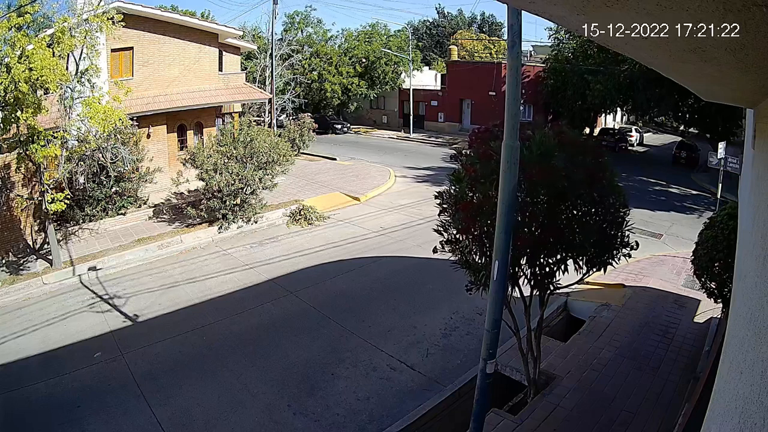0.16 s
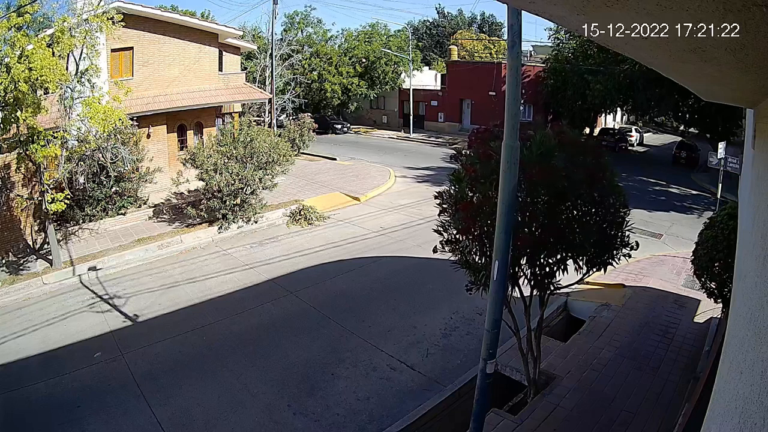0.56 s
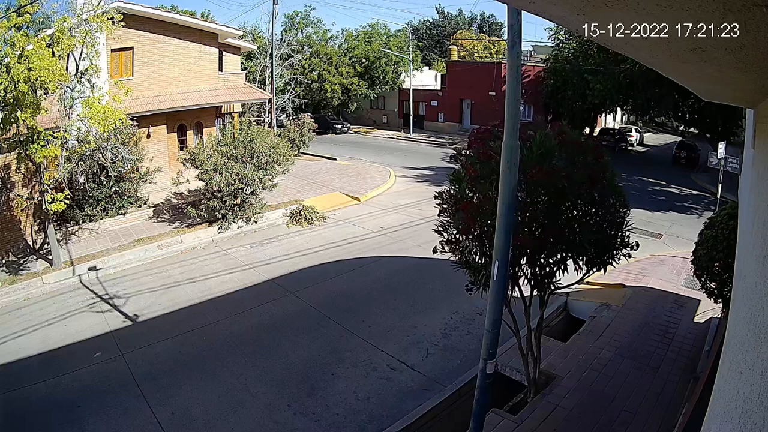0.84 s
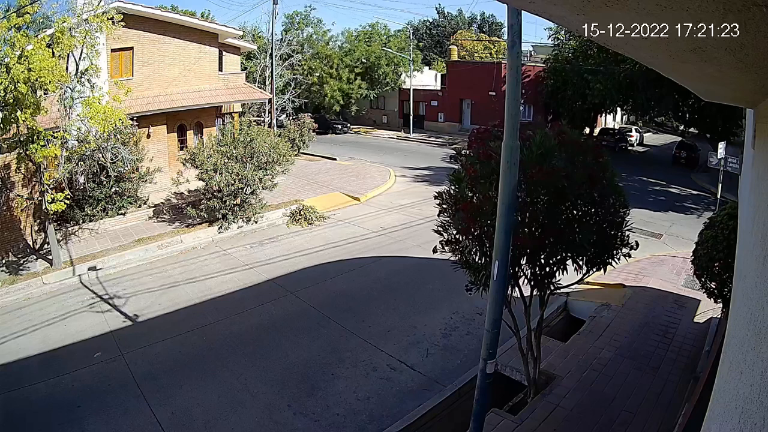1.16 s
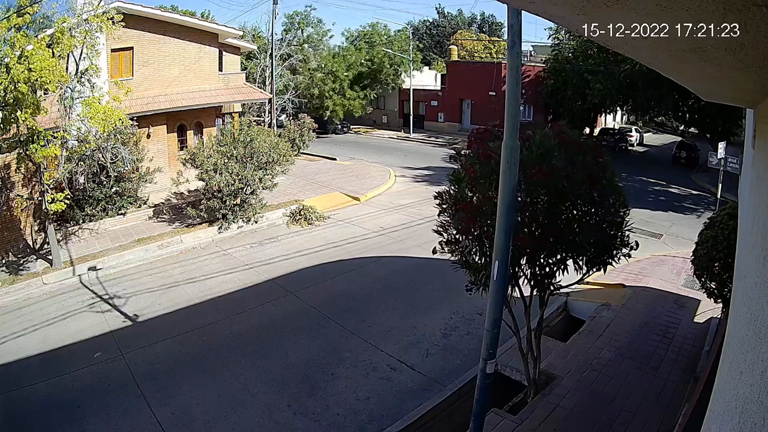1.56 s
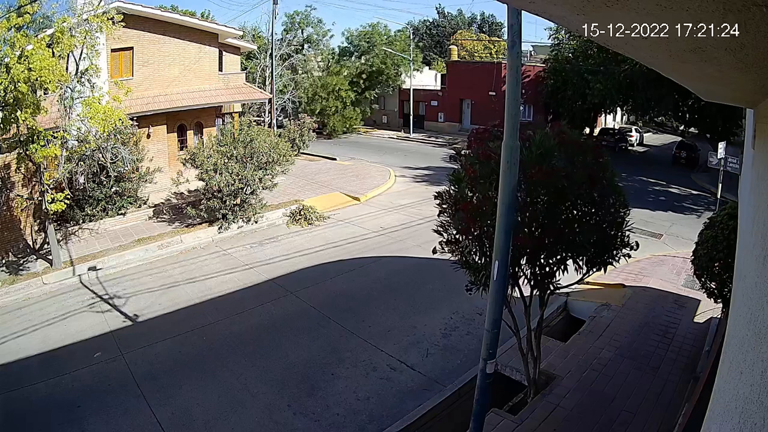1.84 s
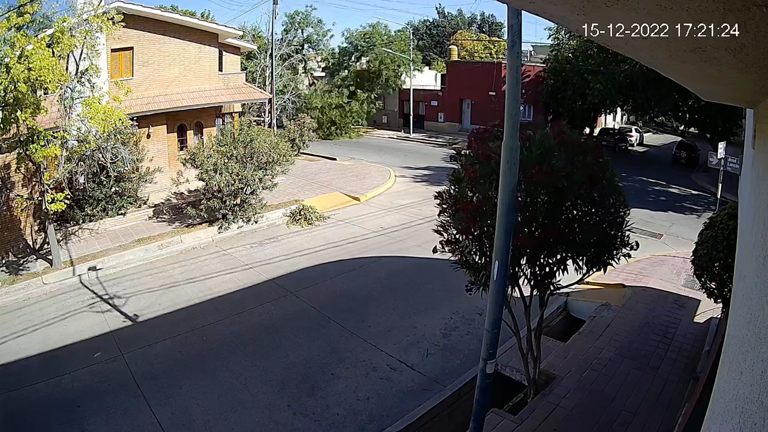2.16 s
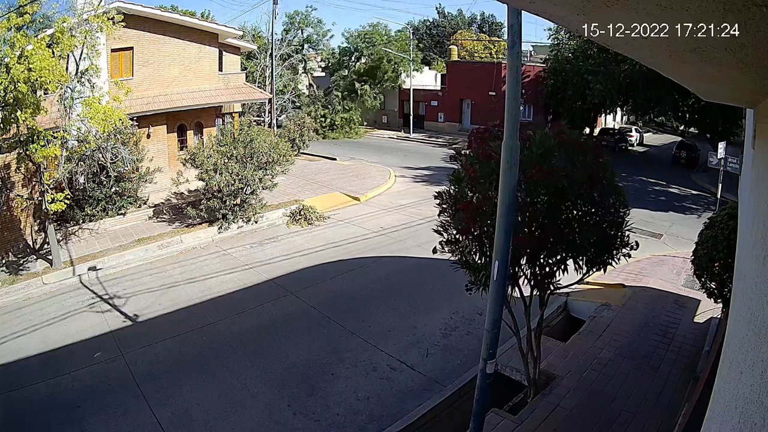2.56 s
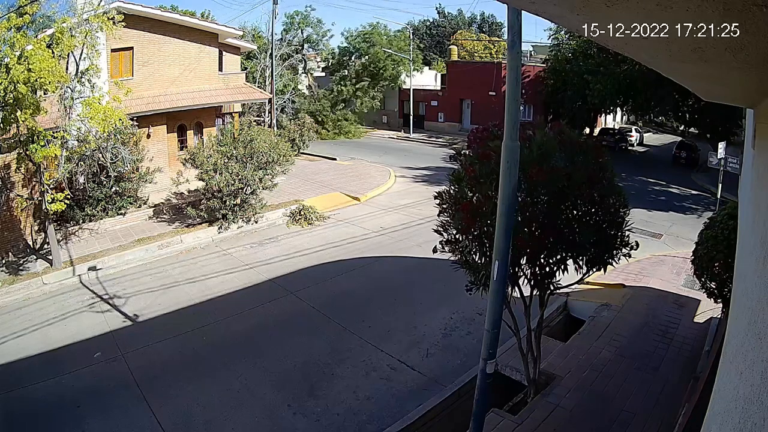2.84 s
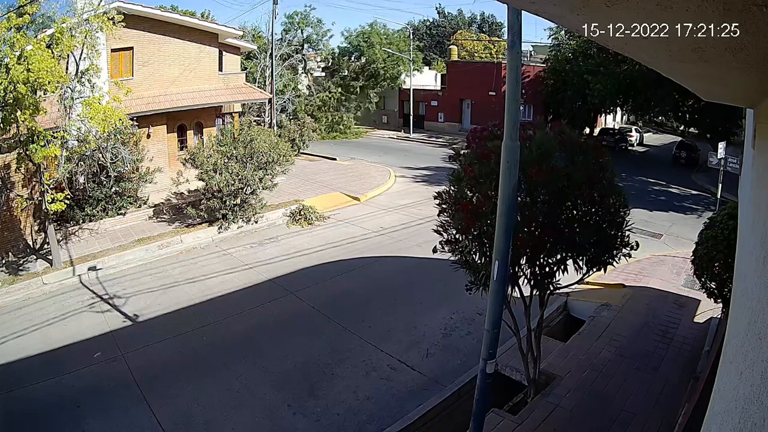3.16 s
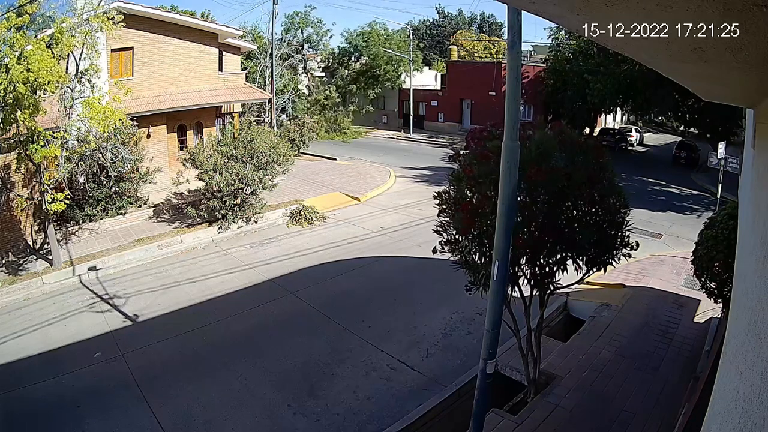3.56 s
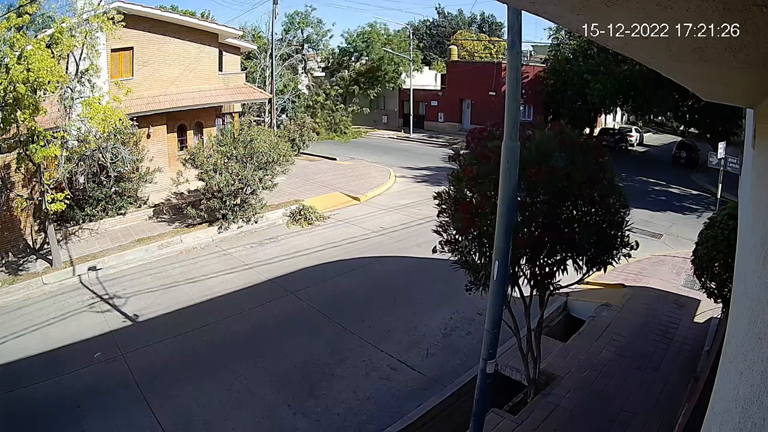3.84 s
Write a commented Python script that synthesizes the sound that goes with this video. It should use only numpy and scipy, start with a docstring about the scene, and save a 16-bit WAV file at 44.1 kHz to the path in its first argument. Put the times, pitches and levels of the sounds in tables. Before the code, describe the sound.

Quiet street, then a sudden loud crack of wood and a dense swarm of snaps, hollow branch knocks and leaf rush, thudding hardest midway and thinning out; short house-front echoes, harsh narrow-band microphone.

```python
"""A big limb splits, tears loose and crashes through its own crown onto the road of a quiet street.
Cracks are sharp snaps and swarms of ringing splinters; thuds are wavering low tones with rumble.
Branches knock as gliding tones, leaves rush as dense ticks, and house fronts echo cracks and knocks.
Behind lie street hush, low wind and a faint wheeze, all shaped from noise.
A small microphone with a peak near 3 kHz overloads on the loudest moments."""
import sys
import numpy as np
from scipy import signal
from scipy.fft import rfft, irfft
from scipy.io import wavfile
from scipy.ndimage import uniform_filter1d

SR = 44100
rng = np.random.default_rng(int(sys.argv[2]) if len(sys.argv) > 2 else 0)


def unload_wav(signal):
    """Save mono or channel-first audio to the path in sys.argv[1] as 16-bit WAV at rate SR, clipped to [-1, 1]."""
    wavfile.write(
        sys.argv[1],
        SR,
        np.round(np.clip(np.atleast_2d(signal).T, -1, 1) * 32767).astype(np.int16),
    )


N = 176400


def from_db(db):
    """Turn dB into gain."""
    return 10 ** (np.asarray(db) / 20)


def rms_one(x):
    """Scale to rms 1."""
    return x / np.sqrt(np.mean(x ** 2) + 1e-20)


def in_time(rows):
    """Draw each column of an automation table as a curve over every sample."""
    s, *columns = np.transpose(rows)
    return [np.interp(np.arange(N) / SR, s, column) for column in columns]


def drift(rate_hz):
    """Slow random wander of rms 1: noise through two equal one-pole low-passes at rate_hz."""
    step = 40   # samples between drawn points
    pole = np.exp(-2 * np.pi * rate_hz * step / SR)
    noise = rng.standard_normal(N // step + 2002)
    slow = signal.lfilter([1], [1, -2 * pole, pole * pole], noise)[2000:]   # skip the settling
    return np.interp(np.arange(N) / step, np.arange(len(slow)), rms_one(slow))


def resonance(x, hz, width_hz):
    """Two-pole resonance with a gain of about 1 at its peak."""
    r = np.exp(-np.pi * width_hz / SR)
    feedback = [1, -2 * r * np.cos(2 * np.pi * hz / SR), r * r]
    return signal.lfilter([(1 - r * r) / 2, 0, (r * r - 1) / 2], feedback, x)


def band_noise(order, low_hz, high_hz):
    """Band-passed noise of rms 1."""
    band = signal.butter(order, [low_hz, high_hz], "band", fs=SR, output="sos")
    return rms_one(signal.sosfilt(band, rng.standard_normal(N)))


def grains(per_s, spread_db):
    """Random clicks of uneven size, each also ringing at one of 40 pitches for 61 cycles (60 dB)."""
    sizes = from_db(spread_db * np.minimum(rng.exponential(1, N), 5)) * rng.choice([-1, 1], N)
    clicks = sizes * (rng.random(N) < per_s / SR)
    pitch_index = rng.integers(0, 40, N)
    rings = np.zeros(N)
    for k, hz in enumerate(np.geomspace(250, 7200, 40)):
        rings += resonance(clicks * (pitch_index == k) + 1e-18, hz, 2.2 * hz / 61)
    return np.sqrt(0.51) * rms_one(rings) + 0.35 * rms_one(clicks)


def coloured(x, spectrum, patchy_db, rate_hz):
    """Shape the spectrum, then let overlapping narrow bands flicker on their own; rms 1."""
    hz, db = np.transpose(spectrum)
    spacing_hz = 140
    bins_hz = np.fft.rfftfreq(N, 1 / SR)
    gain_db = np.interp(np.log(bins_hz + 1), np.log(hz), db, left=-99, right=-99)
    shaped = rfft(x) * from_db(gain_db)
    out = np.zeros(N)
    for centre in np.arange(0, 7600, spacing_hz):
        if hz[0] - spacing_hz < centre < hz[-1] + spacing_hz:
            triangle = np.clip(1 - np.abs(bins_hz - centre) / spacing_hz, 0, 1)
            out += irfft(shaped * triangle, N) * from_db(patchy_db * drift(rate_hz))
    return rms_one(out)


def burst(s, rise_s, t60):
    """Start index and envelope: smooth rise, then exponential fall by 60 dB in t60."""
    start = int(s * SR)
    t = np.arange(min(N - start, int((rise_s + t60) * SR) + 2)) / SR
    rise_s = max(rise_s, .0005)
    rise = np.sin(np.pi / 2 * t / rise_s) ** 2
    fall = from_db(-60 * (t - rise_s) / max(t60, .01))
    return start, np.where(t < rise_s, rise, fall)


# colours of the brittle, woody and treble parts: (frequency [Hz], relative level [dB])
BRITTLE = [(700, -31.5), (1300, -11), (2200, -6), (3000, -5), (3800, -13.5), (4600, -31.5)]
WOODY = [(180, 11.5), (350, 7.5), (600, 7), (1000, 10.5), (1500, 3.5), (2200, -37.5)]
FIZZ = [(3300, -36), (4000, 8.5), (5000, 7.5), (6000, 9.5), (6400, -7), (7300, -16)]
# cracks of wood and twigs: (time [s], relative level [dB], woody part against brittle part [dB],
# rise [s], fall by 60 dB [s])
CRACKS = [(1.13, -6.5, -21, 0.0048, 0.24), (1.137, 7.5, -12, 0.013, 0.16), (1.164, 9, -20, 0.0048, 0.26),
          (1.188, 0, -55, 0.0015, 0.05), (1.237, -4, -34, 0.01, 0.41), (1.267, -4, -46, 0.011, 0.082),
          (1.309, 1, -5.5, 0.0024, 0.19), (1.414, -11, 2.5, 0.0058, 0.13), (1.49, -9, -20, 0.0023, 0.05),
          (1.505, 3, -23, 0.0049, 0.1), (1.513, 9.5, -37, 0.0027, 0.077), (1.529, 14, -18.5, 0.0043, 0.055),
          (1.633, 13.5, -13, 0.0046, 0.1), (1.683, 1.5, -17, 0.0056, 0.18), (1.72, 1, -2, 0.0073, 0.19),
          (1.759, 1.5, 2.5, 0.0042, 0.11), (1.797, -9, 0, 0.0068, 0.082), (1.86, 6.5, -4.5, 0.0029, 0.12),
          (1.893, -8.5, 6.5, 0.003, 0.2), (1.918, 3.5, -23, 0.014, 0.45), (1.941, 5, -4, 0.0023, 0.042),
          (1.968, -4, -2, 0.0046, 0.083), (2.03, -14, 15.5, 0.002, 0.044), (2.104, 4.5, 5.5, 0.0068, 0.24),
          (2.147, 5, -1, 0.0027, 0.15), (2.224, 6, -15, 0.0055, 0.24), (2.271, 10, -21, 0.0071, 0.092),
          (2.373, -7.5, 19.5, 0.0016, 0.17), (2.455, -4.5, 5, 0.013, 0.18),
          (2.519, -2.5, 1.5, 0.002, 0.059), (2.569, 3.5, -10, 0.002, 0.54), (2.62, 1, -8, 0.008, 0.13),
          (2.668, 5.5, -6.5, 0.015, 0.21), (2.715, -7, -9.5, 0.0021, 0.14), (2.76, -3, 10, 0.0046, 0.26),
          (2.837, -2, -14.5, 0.0022, 0.14), (2.907, -9.5, 2, 0.0077, 0.3), (2.946, -7, 4.5, 0.0014, 0.2),
          (3.018, -10, -1.5, 0.0032, 0.17), (3.069, -1, -6, 0.0032, 0.14), (3.113, 4.5, -5, 0.0065, 0.056),
          (3.171, 0.5, -7.5, 0.0062, 0.1), (3.194, 1.5, -26, 0.0046, 0.049), (3.275, 2, -42, 0.0015, 0.15),
          (3.302, 1.5, -7.5, 0.0033, 0.11), (3.315, -5, -5, 0.0026, 0.073), (3.379, -13, -8, 0.0027, 0.05),
          (3.401, 1.5, -15, 0.0037, 0.068), (3.413, 6, -10, 0.006, 0.08), (3.443, -11.5, 10, 0.0099, 0.078),
          (3.492, -1.5, -9, 0.0028, 0.065), (3.542, -1, -2.5, 0.002, 0.12),
          (3.605, -4.5, -24, 0.0028, 0.048), (3.678, -3, -10.5, 0.004, 0.063),
          (3.717, -18, -7, 0.0016, 0.019), (3.771, -10.5, -11, 0.0073, 0.16),
          (3.793, -15.5, -2, 0.0028, 0.075), (3.817, -14, 0, 0.0038, 0.084), (3.84, -2, -25, 0.0017, 0.035),
          (3.857, -8, -2.5, 0.003, 0.21), (3.896, -6.5, -3, 0.003, 0.13), (3.929, -15, 4, 0.0014, 0.12),
          (3.972, -10.5, 2, 0.0028, 0.12)]
CRACKS_DB = -17   # trim on all cracks
FIZZ_DB, FIRST_SNAP_DB = -19.5, -7   # against the brittle part


def cracks():
    """Each crack is a sharp snap and a swarm of ringing splinters: brittle, woody and treble."""
    power = np.zeros((4, N))
    for s, db, woody_db, rise_s, t60 in CRACKS:
        i, shape = burst(s, rise_s, t60)
        shapes = np.array([shape, shape, shape ** 0.82])   # treble fades more slowly
        levels = from_db([[db], [db + woody_db], [db + FIZZ_DB]])
        power[:3, i:i + len(shape)] += (levels * shapes) ** 2
        i, shape = burst(s + rise_s / 2, 0.0017, 0.042)
        power[3, i:i + len(shape)] += (from_db(db + FIRST_SNAP_DB) * shape) ** 2
    splinters = grains(per_s=3000, spread_db=2.5)
    snap = band_noise(4, 900, 3900)
    snap = snap / np.sqrt(uniform_filter1d(snap ** 2, size=90))   # even out its level
    parts = [coloured(splinters, BRITTLE, 1.1, 28.0), coloured(splinters, WOODY, 5.1, 18.8),
             coloured(splinters, FIZZ, 6.7, 22.0), snap]
    return from_db(CRACKS_DB) * np.sum(np.sqrt(power) * parts, axis=0)


# thuds of the limb: (time [s], relative level [dB], pitch [Hz], rise [s], fall by 60 dB [s])
THUDS = [(1.156, -2, 165.7, 0.005, 0.26), (1.165, -16.5, 110.4, 0.012, 0.43),
         (1.236, -18.5, 182.2, 0.045, 0.31), (1.312, -21.5, 149, 0.0077, 0.4),
         (1.647, -27, 134, 0.042, 0.25), (1.75, -30, 159.6, 0.027, 0.64), (1.956, -16.5, 235, 0.023, 0.32),
         (2.067, -9, 149, 0.038, 0.79), (2.117, -12.5, 194.4, 0.013, 0.25), (2.188, 3, 164.4, 0.015, 0.16),
         (2.278, -4, 84.1, 0.015, 1), (2.33, 6.5, 178.7, 0.005, 0.3), (2.369, 5, 138, 0.0073, 0.38),
         (2.437, -4, 119.4, 0.013, 0.42), (2.487, -6, 75.4, 0.01, 0.26), (2.559, -10, 173, 0.015, 0.78),
         (2.653, -13.5, 138, 0.012, 1), (2.752, -0.5, 174.4, 0.014, 0.35),
         (2.848, -10.5, 103.5, 0.015, 0.32), (2.951, -13, 175.3, 0.012, 0.38),
         (3.111, -15.5, 174, 0.0059, 0.31), (3.224, -12, 183.3, 0.0063, 1), (3.4, -14.5, 194.8, 0.01, 0.74),
         (3.55, -14.5, 246, 0.0055, 0.23), (3.791, -31.5, 329, 0.0067, 0.36)]
THUDS_DB, RUMBLE_DB = -5, -7   # trim on all thuds; rumble rms against tone peak
WAVER_SHARE = 0.06   # rms pitch waver as a share of the pitch


def thuds():
    """The heavy limb sounds a wavering low tone with broad rumble around it."""
    out = np.zeros(N)
    waver = drift(44.0)
    rumble = band_noise(2, 90, 420)
    for s, db, hz, rise_s, t60 in THUDS:
        i, shape = burst(s, rise_s, t60)
        span = slice(i, i + len(shape))
        turns = rng.random() + np.cumsum(hz * (1 + WAVER_SHARE * waver[span])) / SR
        body = np.sin(2 * np.pi * turns) + from_db(RUMBLE_DB) * rumble[span]
        out[span] += from_db(db + THUDS_DB) * shape * body
    return out


# hollow knocks and creaks of thick branches: (time [s], main tone level [dB], starting pitch [Hz],
# fall by 60 dB [s], glide [Hz per s])
KNOCKS = [(1.651, -10, 467, 0.18, 902), (1.656, -16.5, 375, 0.24, -1500.), (1.956, -10, 1030, 0.39, -1800.),
          (1.953, -17, 326, 0.2, -4), (2.765, -9, 507, 0.2, 11996), (2.767, -9, 282, 0.38, 5001),
          (2.851, -13, 337, 0.2, -3500.), (3.299, -13.5, 1085, 0.13, 5995), (3.545, -9, 1260, 0.021, -5),
          (3.90, -22.5, 691, 0.13, 9)]


def knocks():
    """A tone and a weak partial 1.8 times higher glide as the branch bends, until they are stopped."""
    out = np.zeros(N)
    for s, db, hz, t60, glide in KNOCKS:
        i, shape = burst(s, 0.0052, t60)
        t = np.arange(len(shape)) / SR
        phase = 2 * np.pi * (hz * t + glide * t * t / 2)
        stopped = np.clip((0.36 * t60 - t) / 0.0042 + 1, 0, 1)   # 4.2 ms fade-out
        tones = np.sin(phase) + 0.14 * np.sin(1.8 * phase)
        out[i:i + len(shape)] += from_db(db) * shape * stopped * tones
    return out


# rush of leaves: (time [s], level of the main part [dB], lower part against it [dB],
# treble against it [dB])
LEAVES = [(1.14, -41, 39, 31.5), (1.19, -53.5, 16, 23.5), (1.31, -24, -7, -12), (1.47, -32, -7, -14.5),
          (1.52, -21.5, -9, -1), (1.62, -19.5, -10, -12), (1.65, -12.5, 2, -16), (1.71, -17, -9.5, -10),
          (2.18, -19, 1.5, -10), (2.35, -10.5, -1, -10), (2.74, -19, -8.5, -8), (2.78, -14, 1, -13.5),
          (2.9, -21, -4.5, -10.5), (3.39, -24.5, -7, -5), (3.43, -19.5, 1, -18), (3.51, -23.5, -30, -2.5),
          (3.56, -20, -7, -10.5), (3.76, -37.5, -11, -5), (3.82, -30.5, -8.5, -7), (4.0, -40, -15, -8.5)]
# colour of the main part: (frequency [Hz], relative level [dB])
LEAF_RUSH = [(800, -19), (1300, -4), (2000, 2.5), (3000, 1.5), (3800, -6.5), (4600, -30.5)]


def leaves():
    """Dense ticks of leaves and twigs rush in with the break, their level wandering."""
    level_db, low_db, high_db = in_time(LEAVES)
    ticks = grains(per_s=9000, spread_db=1)
    begun = np.clip((np.arange(N) / SR - LEAVES[0][0]) / 0.023, 0, 1)   # 23 ms fade-in
    rush = coloured(ticks, LEAF_RUSH, 2.42, 9.3)
    rush = rush + from_db(low_db) * coloured(ticks, WOODY, 7.3, 26.0)
    rush = rush + from_db(high_db) * coloured(ticks, FIZZ, 5.4, 8.1)
    return begun * from_db(level_db + 1.68 * drift(12.6)) * rush


# faint brief wheeze before the break: (frequency [Hz], width of each resonance [Hz], level [dB])
WHEEZE = [(3060, 210, -55.5), (3990, 190, -50), (5870, 840, -46.5)]
WHEEZE_S, WHEEZE_LENGTH_S = 0.797, 0.024   # centre, and time from there to a fall to 1/e


def wheeze():
    """Noise through pairs of equal resonances swells and fades as a flickering bell shape."""
    bell = np.exp(-((np.arange(N) / SR - WHEEZE_S) / WHEEZE_LENGTH_S) ** 2)
    white = rng.standard_normal(N)
    bands = np.zeros(N)
    for hz, width_hz, db in WHEEZE:
        twice = resonance(resonance(white, hz, width_hz), hz, width_hz)
        bands += from_db(db) * rms_one(twice)
    return bell * from_db(3.4 * drift(60.0)) * bands


# wind on the microphone: (time [s], level [dB])
BREEZE = [(0.0, -65), (0.05, -55), (0.78, -54), (0.83, -42), (2.09, -49), (2.19, -15.5), (2.24, -20.5),
          (2.35, -19), (2.72, -33.5), (2.8, -23.5), (3.04, -47), (3.21, -23), (3.29, -63.5), (3.6, -33),
          (3.8, -39), (4.0, -54)]


def wind():
    """Very low band noise follows the level curve, with random lumps of 5 dB spread."""
    return band_noise(2, 36, 67.6) * from_db(in_time(BREEZE)[0] + 5 * drift(11.0))


# colour of the street hush: (frequency [Hz], relative level [dB])
STREET = [(90, 8), (170, 1.5), (300, -4), (600, -8.5), (1200, -13.5), (2500, -15.5), (3500, -12),
          (4600, -18.5), (6000, -22.5), (6500, -26.5), (7300, -42.5)]
STREET_DB = -51   # rms


def street_hush():
    """Steady noise, strongest in the lows, its bands flickering."""
    return from_db(STREET_DB) * coloured(rng.standard_normal(N), STREET, 5.0, 25.0)


# echoes off the house fronts: (delay [s], level [dB])
ECHOES = [(.011, -16.5), (.023, -13.5), (.037, -20.5), (.058, -30)]


def street_echo(x):
    """House fronts return a few slightly dulled echoes of alternating polarity."""
    dull = signal.sosfilt(signal.butter(1, 8800, fs=SR, output="sos"), x)
    out = x.copy()
    for k, (s, db) in enumerate(ECHOES):
        lag = int(s * SR)
        out[lag:] += (-1) ** k * from_db(db) * dull[:N - lag]
    return out


def scene():
    """Mix all sources at the microphone, as one channel."""
    echoed = street_echo(cracks() + knocks())
    return (echoed + thuds() + leaves() + wheeze() + wind() + street_hush())[None]


def roll_off(x):
    """The treble ends steeply here."""
    return signal.sosfilt(signal.butter(12, 15890, fs=SR, output="sos"), x)


MIC_PEAK_HZ, MIC_PEAK_WIDTH_HZ, MIC_PEAK_DB = 2850, 480, 7.5
DIP_HZ, DIP_WIDTH_HZ, DIP_SHARE = 6710, 260, 0.29   # share of the resonance taken away
SOFT_TOP, HARD_TOP = 0.62, 0.685   # overload ceilings, full scale = 1
BAND_LIMIT_HZ = 7230


def record(dry):
    """Microphone peak, soft overload, treble dip, steep band limit, then hard clipping."""
    peak = resonance(dry, MIC_PEAK_HZ, MIC_PEAK_WIDTH_HZ)
    x = dry + (from_db(MIC_PEAK_DB) - 1) * peak
    x = SOFT_TOP * np.tanh(x / SOFT_TOP)
    x = x - DIP_SHARE * resonance(x, DIP_HZ, DIP_WIDTH_HZ)
    x = signal.sosfilt(signal.ellip(12, .5, 80, BAND_LIMIT_HZ, fs=SR, output="sos"), x)
    mix = np.clip(x, -HARD_TOP, HARD_TOP)
    return roll_off(mix)


dry = scene()
out = record(dry)
unload_wav(out)
```